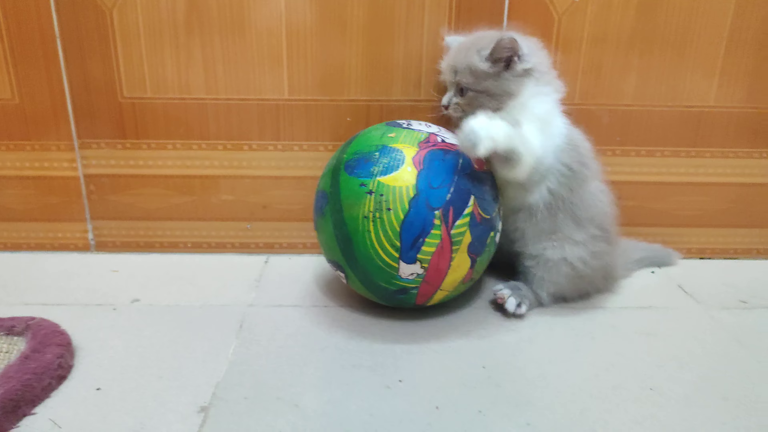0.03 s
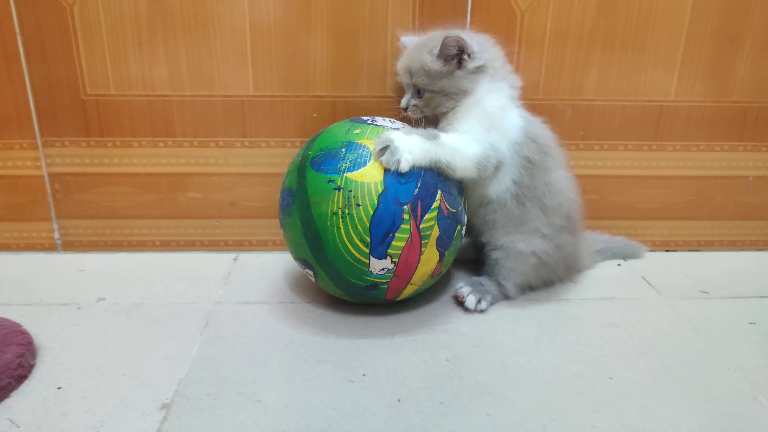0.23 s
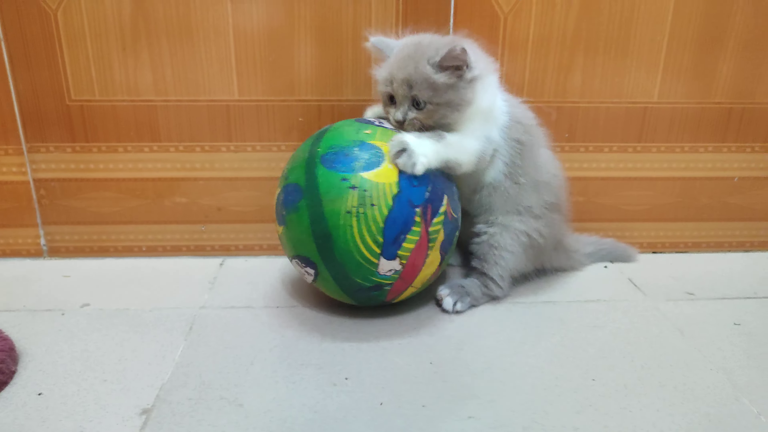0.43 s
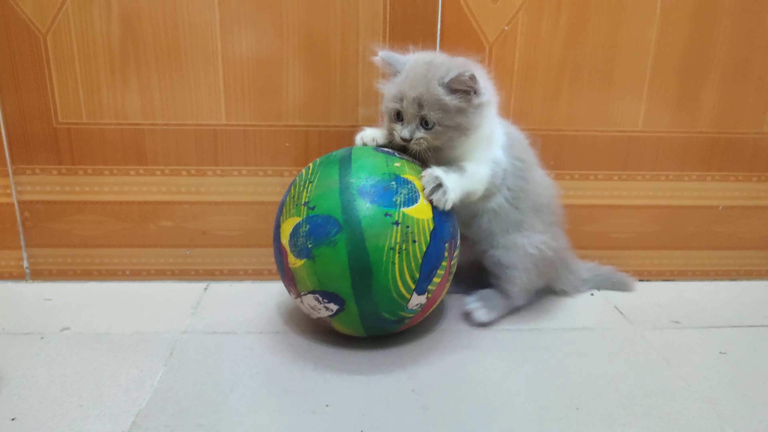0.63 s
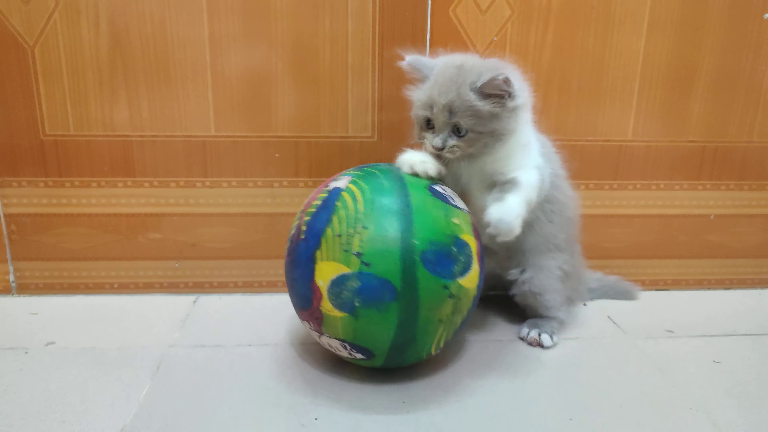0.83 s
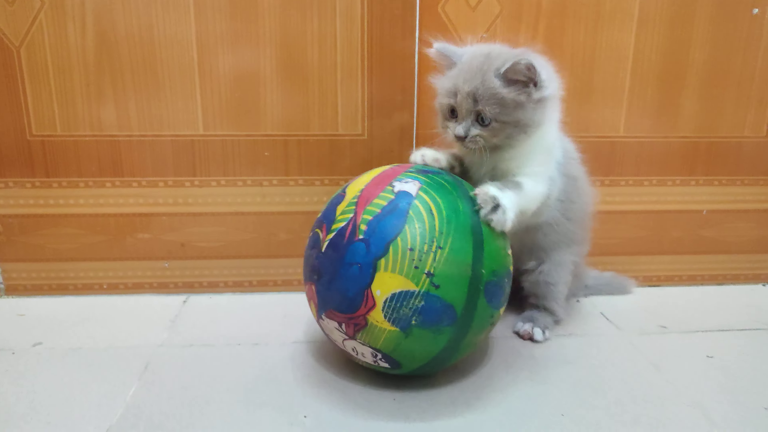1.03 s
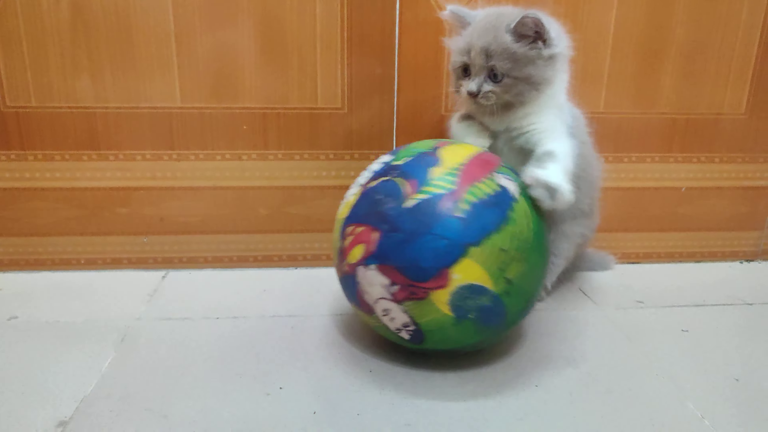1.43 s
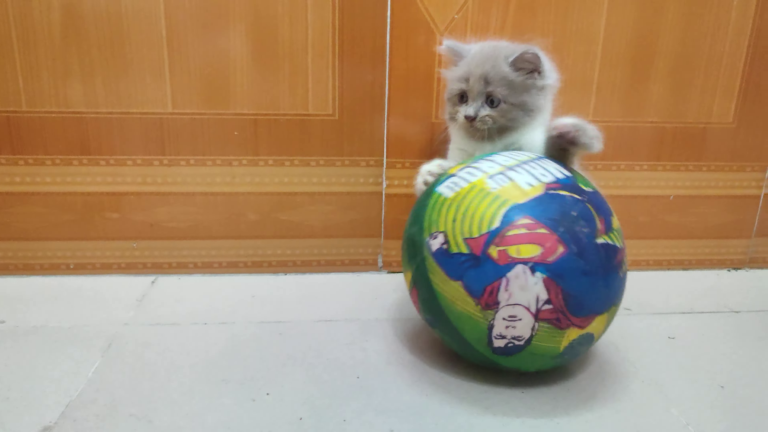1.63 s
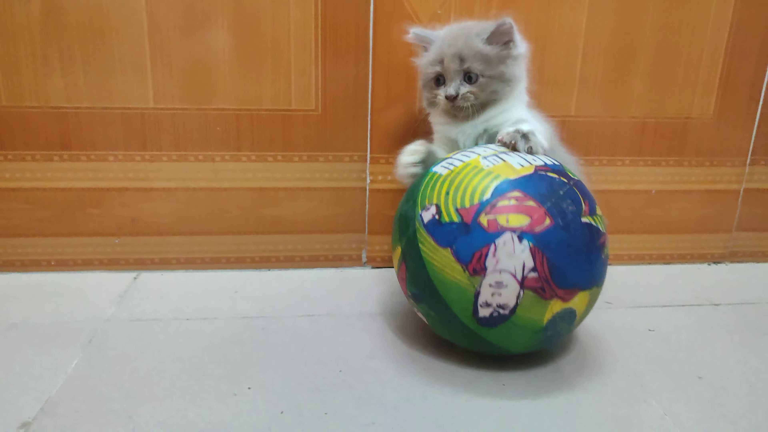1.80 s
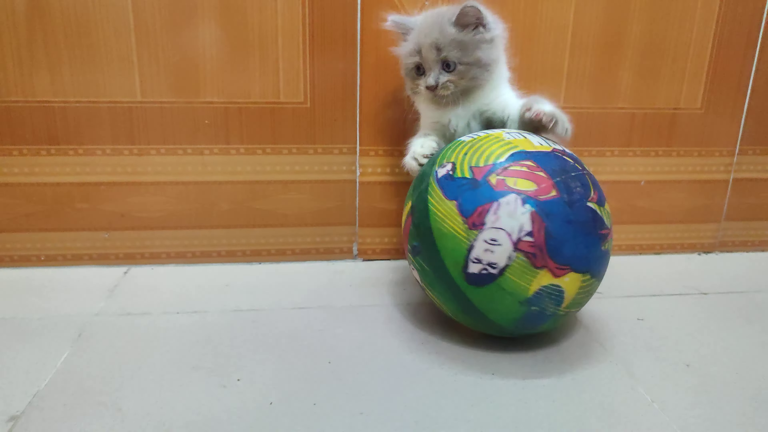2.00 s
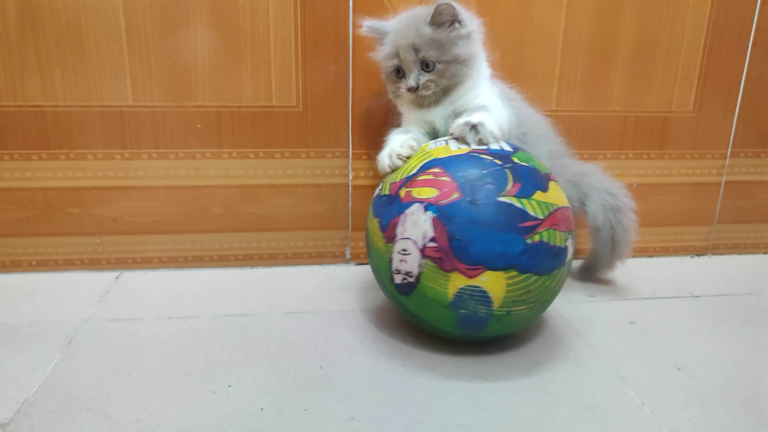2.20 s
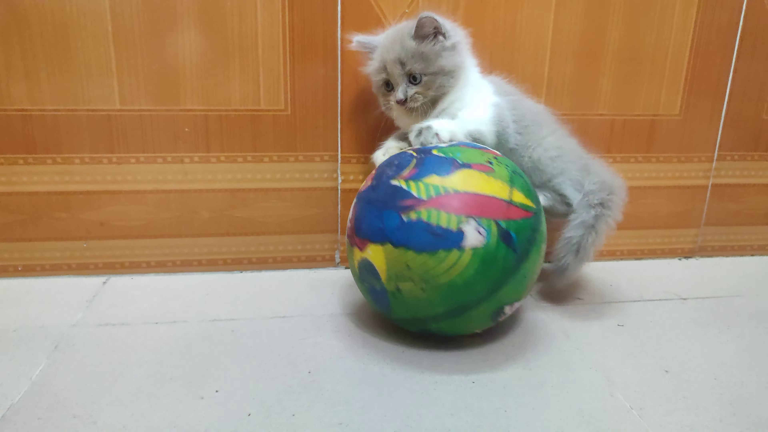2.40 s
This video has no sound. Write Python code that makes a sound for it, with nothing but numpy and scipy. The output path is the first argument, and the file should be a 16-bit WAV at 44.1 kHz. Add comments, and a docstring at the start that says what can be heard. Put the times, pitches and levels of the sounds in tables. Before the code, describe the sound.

A kitten's claws scuff a rubber ball in short hissing strokes, slightly to the right. A dull tap hits close to the microphone, then the ball rolls softly and gives one hollow knock in a bare, echoing room.

```python
"""The recorder switches on with three dry ticks, a low room rumble fades in, and soft bumps sound close by.
From half a second on, a kitten paws at a rubber ball on a tiled floor, a little to the right: stick-slip
friction of its claws makes short hissing scuffs, and a dull tap sounds at the microphone. The ball is
touched, murmurs as it rolls, and near two seconds rings in its modes with one hollow knock. A hard, bare
room reverberates after the scuffs, the bumps and the ball."""
import sys
import numpy as np
from scipy import signal
from scipy.fft import rfft, irfft, next_fast_len
from scipy.io import wavfile
from scipy.ndimage import map_coordinates

SR = 44100
rng = np.random.default_rng(int(sys.argv[2]) if len(sys.argv) > 2 else 0)


def inscribe(sig):
    """Save sig as 16-bit PCM at rate SR to the path in sys.argv[1].

    A 1-D sig is mono; a 2-D sig holds one channel per row.
    Samples are clipped to [-1, 1] before scaling.
    """
    pcm = np.round(np.clip(np.atleast_2d(sig).T, -1, 1) * 32767)
    wavfile.write(sys.argv[1], SR, pcm.astype(np.int16))


N = 112454
AGE = np.arange(SR // 4) / SR  # seconds within one contact
BALL_PAN_DB, BALL_EARLY_DB, BALL_TAIL_DB = -2, -13, -4.5

# Spectrum of a contact's rustle or crack. Each row: frequency in Hz, relative level in dB.
CONTACT_SPECTRUM = [(100, -10), (700, 3), (1300, -3), (2400, -1), (4000, -4), (7400, -4), (9500, -17),
                    (14000, -16)]


def amp(db):
    """Amplitude grows tenfold for every 20 dB."""
    return 10 ** (np.asarray(db) / 20)


def unit(x):
    """Normalisation to an rms of 1."""
    return x / np.sqrt(np.mean(x ** 2) + 1e-20)


def along(points, hz):
    """Interpolation of (Hz, value) points on a logarithmic frequency axis."""
    frequencies, values = np.transpose(points)
    return np.interp(np.log(hz + 1), np.log(frequencies + 1), values)


def filtered(x, response):
    """Linear filtering: the spectrum of x is multiplied by a frequency response."""
    length = x.shape[-1]
    size = next_fast_len(length + 1024, True)
    return irfft(rfft(x, size) * response(np.fft.rfftfreq(size, 1 / SR)), size)[..., :length]


def add(out, start, x):
    """Superposition: x joins out from start seconds on."""
    part = out[..., round(start * SR):][..., :x.shape[-1]]
    part += x[..., :part.shape[-1]]


def pan(db):
    """Level difference as a cue to direction: two gains, left minus right being db."""
    return amp(np.array([[db], [-db]]) / 2)


def place(x, lead_s, pan_db):
    """Time and level differences: the left channel leads the right by lead_s."""
    return pan(pan_db) * filtered(x, lambda hz: np.exp(1j * np.pi * hz * lead_s * np.array([[1], [-1]])))


def envelope(attack, hold, release):
    """Linear rise, hold, then exponential decay of 20 dB per release time, all in seconds."""
    return np.minimum(AGE / attack, 1) * amp(-20 * np.maximum(AGE - attack - hold, 0) / release)


def wobble(rate, seconds):
    """Smooth random modulation with rate knots a second."""
    return map_coordinates(rng.standard_normal(size=512), [seconds * rate], mode="mirror")


def resonance(hz, centre_hz, width_hz):
    """A Lorentzian resonance curve of height 1."""
    return 1 / (1 + (2 * (hz - centre_hz) / width_hz) ** 2)


def pulse(width_s, edge):
    """A transient that builds edge times faster than it relaxes."""
    u = AGE / width_s
    return (u / 2 - 1) * np.exp(-u) * (1 - np.exp(-edge * u))


def slips(response, per_second=14000, spread_db=2):
    """Stick-slip noise: dense impulses of uneven size, filtered, at an rms of 1."""
    sizes = rng.standard_normal(len(AGE)) * amp(spread_db * rng.standard_normal(len(AGE)))
    slipping = rng.random(len(AGE)) < per_second / SR
    return unit(filtered(sizes * slipping, response))


def room(x, early_db, tail_db, early_t60_s=.06):
    """Reverberation: early reflections from floor and door, then the diffuse tail of the hard room."""
    # Reverberation times. Each row: frequency in Hz, seconds to fall 60 dB.
    decay_times = [(100, .4), (250, .6), (600, .95), (1400, .93), (3700, .76), (7000, .66), (13000, .48)]
    hz, frame_s, spectra = signal.stft(rng.standard_normal((2, SR)), SR, nperseg=256)
    decay = amp(-60 * frame_s / along(decay_times, hz)[:, None])
    t = np.arange(SR) / SR
    tail = signal.istft(spectra * decay, SR, nperseg=256)[1][:, :SR] * np.minimum(t / .01, 1)
    tail /= np.linalg.norm(tail[0])
    echoes = rng.standard_normal((2, SR)) * (rng.random((2, SR)) < .1)
    early = echoes * amp(-60 * t / early_t60_s) * (t > .001)
    early /= np.linalg.norm(early, axis=1)[:, None]
    impulse_response = amp(early_db) * early + amp(tail_db) * tail
    return pan(-1.5) * signal.fftconvolve(x[None], impulse_response, axes=1)[:, :len(x)]


def rumble(start_s=.088, fade_s=.08, level_db=-54):
    """Partly coherent room noise: a rumble alike in both ears, under a faint wide hiss."""
    # Background spectrum. Each row: frequency in Hz, relative level in dB.
    spectrum = [(15, -20), (38, 0), (50, -6), (66, -1), (100, -7), (135, -16), (250, -20.5), (500, -26.5),
                (1000, -30), (1600, -35), (2400, -29.5), (3300, -39.5), (7300, -41), (9200, -49),
                (14000, -47)]
    # Likeness of left and right. Each row: frequency in Hz, correlation.
    coherence = [(60, .92), (200, .75), (500, .45), (1200, .1), (8000, .1)]

    def mid_and_side(hz):
        angle = np.arccos(np.clip(along(coherence, hz), -1, 1)) / 2
        return amp(along(spectrum, hz)) * [np.cos(angle), np.sin(angle)]

    mid, side = filtered(rng.standard_normal((2, N)), mid_and_side)
    waver_db = map_coordinates(rng.standard_normal(size=24), [np.linspace(0, 20, N)])
    fade_in = np.clip((np.arange(N) / SR - start_s) / fade_s, 0, 1)
    return pan(-2) * amp(level_db + waver_db) * fade_in * unit(np.array([mid + side, mid - side]))


def ticks():
    """Switching transients: three dry ticks as the recorder switches on."""
    # Switch-on ticks. Each row: start in seconds, level in dB, width in seconds, left minus right in dB.
    clicks = [(.0905, -45, .006, 1), (.1305, -44, .003, -1), (.1705, -40, .003, -2)]
    out = np.zeros((2, N))
    for start, db, width, pan_db in clicks:
        add(out, start, pan(pan_db) * amp(db) * pulse(width, edge=150))
    return out


def bumps():
    """Soft impacts excite mostly low frequencies: a thud with a hollow resonance and a brief rustle."""
    # Close contacts. Each row: start in seconds, level in dB, rustle against thud in dB,
    # resonance in Hz, its boost in dB.
    contacts = [(.2255, -47.5, -4, 500, 5), (.290, -54, -11, 300, 3), (1.357, -50, -4, 640, 20),
                (1.671, -47.5, -8, 850, 8), (1.755, -47.5, -7.5, 420, 6), (1.868, -54, -8, 330, 4),
                (2.015, -49.5, -14, 280, 11), (2.272, -54, -14, 290, 5), (2.450, -53, -3, 750, 10),
                (2.469, -49.5, -15, 200, 2)]
    # Spectrum of a thud. Each row: frequency in Hz, relative level in dB.
    spectrum = [(30, -15), (90, -2), (160, 0), (270, -11), (420, -10), (700, -19), (1300, -28), (5000, -50)]
    out = np.zeros(N)
    for start, db, rustle_db, hollow_hz, boost_db in contacts:
        thud = slips(lambda hz: amp(along(spectrum, hz) + boost_db * resonance(hz, hollow_hz, 150)))
        rustle = amp(rustle_db) * slips(lambda hz: amp(along(CONTACT_SPECTRUM, hz)))
        add(out, start, amp(db) * envelope(attack=.002, hold=.004, release=.014) * (thud + rustle))
    return pan(-2.5) * out + room(out, early_db=-10, tail_db=-5)


def scrape(tilt, low_hz, low_db, high_hz, high_db):
    """Friction noise passes two resonances that wander independently as the claws travel."""
    # Friction spectrum. Each row: frequency in Hz, relative level in dB.
    spectrum = [(100, -45), (1300, -26), (1600, -20), (1900, -5), (2600, -5), (3100, -12), (4300, -6),
                (5000, -11), (7500, -8), (8400, -17), (9600, -22), (12000, -16), (14000, -21)]
    hiss = slips(lambda hz: amp(along(spectrum, hz) + tilt * np.log2(np.maximum(hz / low_hz, 1))))
    hz, frame_s, spectra = signal.stft(hiss, SR, nperseg=384)
    for centre_hz, boost_db in (low_hz, low_db), (high_hz, high_db):
        wandering_hz = centre_hz * (1 + .05 * wobble(rate=70, seconds=frame_s))
        spectra = spectra * amp(boost_db * resonance(hz[:, None], wandering_hz, width_hz=420))
    return unit(signal.istft(spectra, SR)[1][:len(AGE)])


def scuffs(grip_db=2.3):
    """Stick-slip friction: each paw stroke scrapes over a duller body, with room echoes of its own."""
    # Paw strokes. Each row: start, attack, hold and release in seconds, level in dB, tilt in dB per
    # octave, low resonance in Hz, its boost in dB, high resonance in Hz, its boost in dB, body in dB.
    strokes = [(.509, .001, .008, .022, -54.5, -4, 2300, 8, 3650, 3, 7),
               (.530, .012, .008, .018, -52.5, -3.5, 2350, 8, 3650, 5, -5),
               (.793, .002, .005, .012, -56.5, 0, 2500, 7, 3750, 6, -8),
               (.856, .003, .009, .02, -47, -.5, 2550, 2, 3600, 13, -15),
               (.873, .002, .008, .11, -47, .5, 2650, 2, 3680, 13, -17),
               (.913, .005, .004, .02, -42, 1.5, 2100, 9, 3800, 3, -20),
               (.919, .003, .012, .05, -39, 1.5, 2300, 3, 3700, 9, -20),
               (.953, .004, .006, .012, -43.5, 1, 2400, 5, 4000, 6, -12),
               (1.155, .035, .006, .025, -48, -.5, 2350, 7, 3800, 2, -14),
               (1.202, .005, .008, .02, -45, 0, 2400, 5, 4000, 3, -3),
               (1.211, .004, .004, .03, -41.5, -1, 2170, 8, 4300, 2, -11),
               (1.220, .002, .006, .022, -39, 0, 2400, 1, 4200, 11, -14),
               (1.233, .002, .004, .025, -45, -1, 2450, 7, 3750, 6, -10),
               (1.811, .008, .010, .012, -59, 1, 2400, 5, 4000, 6, -6),
               (1.858, .008, .09, .04, -63.5, 1, 2500, 4, 4100, 6, -1),
               (2.102, .008, .006, .02, -60, 1, 2400, 4, 4000, 6, 1),
               (2.262, .005, .004, .02, -60, -1.5, 2600, 7, 3900, 4, -3),
               (2.455, .015, .02, .08, -65, 0, 2000, 2, 4400, 6, -1)]
    # Spectrum of the dull body. Each row: frequency in Hz, relative level in dB.
    body_spectrum = [(60, -25), (200, -15), (380, -6), (550, 1), (720, 0), (900, -1), (1200, -2),
                     (1700, -6), (3000, -25), (12000, -50)]
    # Further level difference between the ears. Each row: frequency in Hz, left minus right in dB.
    balance = [(500, -1), (1200, -2.5), (2400, -3), (4200, -7.5), (7500, -1), (12000, 0)]
    out = np.zeros((2, N))
    for start, attack, hold, release, db, *colour, body_db in strokes:
        body = amp(body_db) * slips(lambda hz: amp(along(body_spectrum, hz)))
        grip = unit(amp(grip_db * wobble(rate=350, seconds=AGE)))  # the claws catch and let go
        stroke = amp(db) * envelope(attack, hold, release) * grip * (scrape(*colour) + body)
        stroke = np.pad(stroke, (0, SR // 2))  # time for the room to ring
        direct = place(stroke, lead_s=.00037, pan_db=-2)
        add(out, start, direct + room(stroke, early_db=-3, tail_db=-3.7))
    return filtered(out, lambda hz: amp(along(balance, hz) * np.array([[1], [-1]]) / 2))


def tap(start_s=.5622, level_db=-24, snap_t60_s=.002, snap_hz=7000):
    """A dull pressure pulse with a tiny bright snap, close to the microphone's right side."""
    out = np.zeros(N)
    snap = amp(-16.5 - 60 * AGE / snap_t60_s) * slips(lambda hz: hz / (hz + snap_hz))
    add(out, start_s, amp(level_db) * (pulse(width_s=.00042, edge=4) + snap))
    return pan(-15) * out


def knock(crack_db=-11, crack_t60_s=.009):
    """Modal ringing: light touches and one firm blow excite the ball's hollow, quickly damped modes."""
    # Modes of the ball. Each row: frequency in Hz, relative level in dB, seconds to fall 60 dB.
    modes = [(275, -17, .085), (850, 0, .014), (1130, -4, .016), (2000, -5, .016), (2380, -14, .016),
             (3250, -19, .007), (5400, -20, .007)]
    # Blows on the ball. Each row: start in seconds, level in dB.
    blows = [(1.4412, -42), (1.9935, -43), (1.9972, -40), (1.9983, -31.5)]
    out = np.zeros(N)
    ring = sum(amp(db - 60 * AGE / t60) * np.sin(2 * np.pi * hz * AGE) for hz, db, t60 in modes)
    for start, db in blows:
        noise = slips(lambda hz: amp(along(CONTACT_SPECTRUM, hz)))
        crack = amp(crack_db - 60 * AGE / crack_t60_s) * noise
        add(out, start, amp(db) * (ring + crack))
    return place(out, lead_s=.00027, pan_db=BALL_PAN_DB) + room(out, BALL_EARLY_DB, BALL_TAIL_DB)


def roll():
    """Rolling noise: continuous contact with the tiles makes the ball murmur."""
    # Swell of the murmur. Each row: time in seconds, level in dB.
    swell = [(1.6, -85), (1.7, -66), (1.95, -66), (2.05, -61), (2.3, -67), (2.55, -67)]
    # Spectrum of the murmur. Each row: frequency in Hz, relative level in dB.
    spectrum = [(60, -30), (200, -9), (310, 0), (420, -5), (560, -13), (760, -6), (1100, -12), (1500, -24),
                (6000, -40)]
    times, db = np.transpose(swell)
    murmur = unit(filtered(rng.standard_normal(N), lambda hz: amp(along(spectrum, hz))))
    out = murmur * np.interp(np.arange(N) / SR, times, amp(db), left=0)
    return pan(BALL_PAN_DB) * out + room(out, BALL_EARLY_DB, BALL_TAIL_DB)


def scene():
    """Superposition: kitten, ball, close contacts, switch-on ticks and room noise add."""
    return scuffs() + knock() + roll() + bumps() + ticks() + tap() + rumble()


def record(dry):
    """Band limiting: a steep low-pass filter removes the highest treble."""
    cutoff_hz = 14300
    return filtered(dry, lambda hz: 1 / (1 + (hz / cutoff_hz) ** 120))


dry = scene()
out = record(dry)
inscribe(out)
```